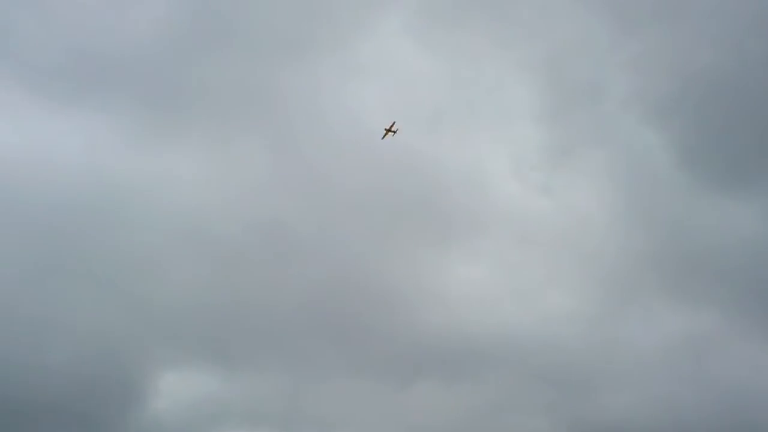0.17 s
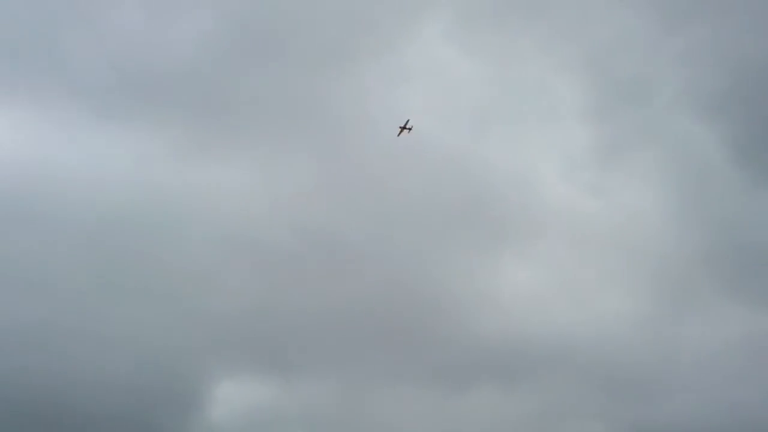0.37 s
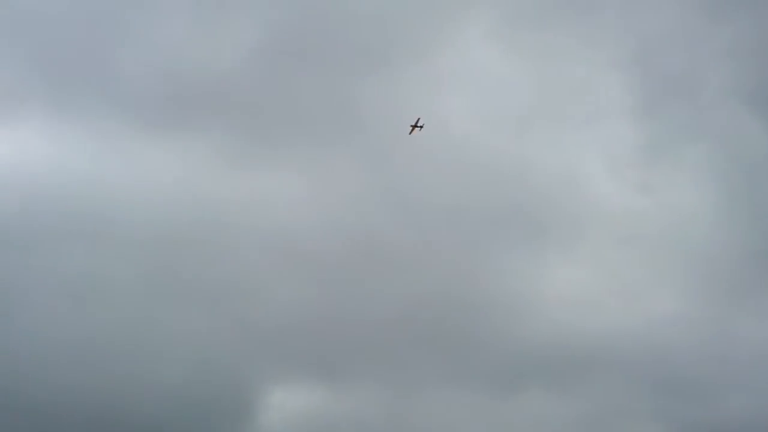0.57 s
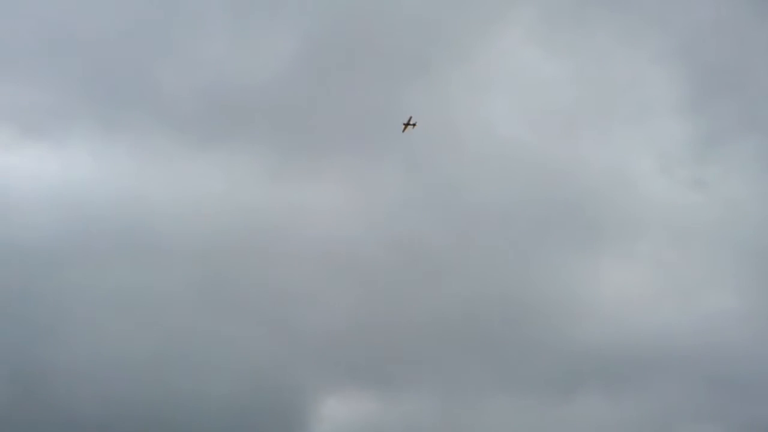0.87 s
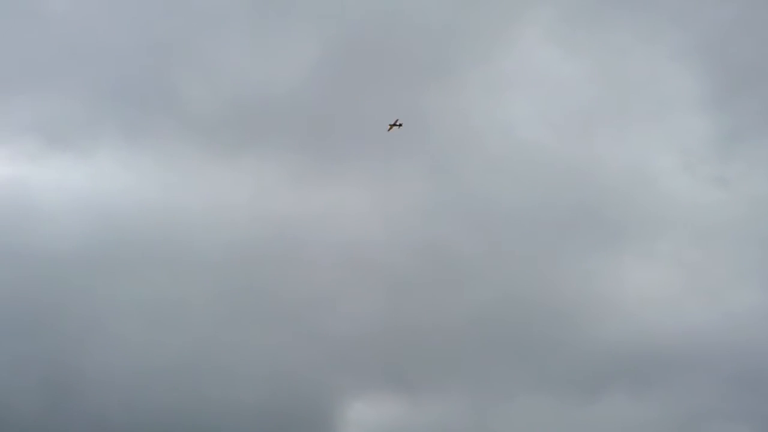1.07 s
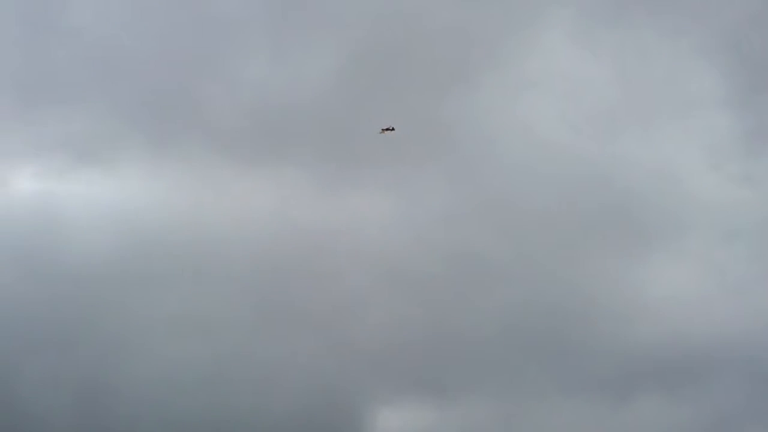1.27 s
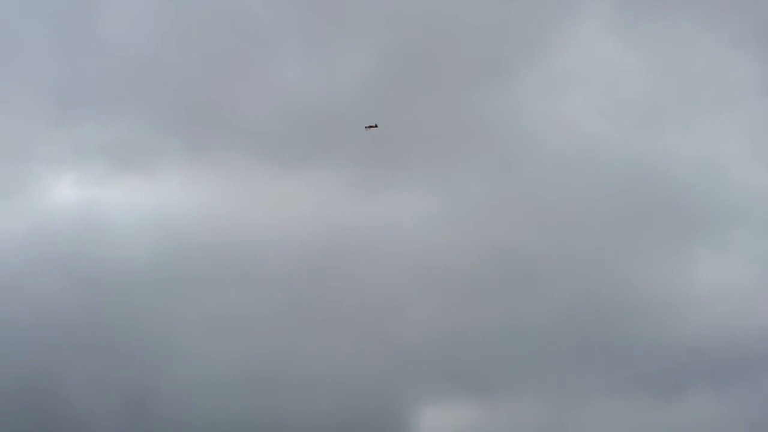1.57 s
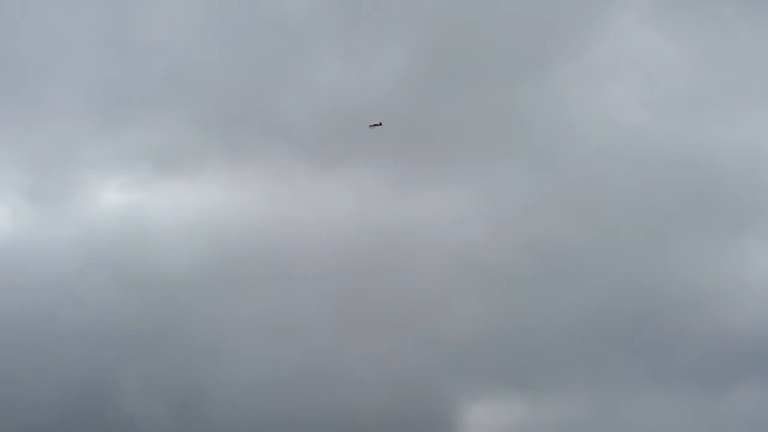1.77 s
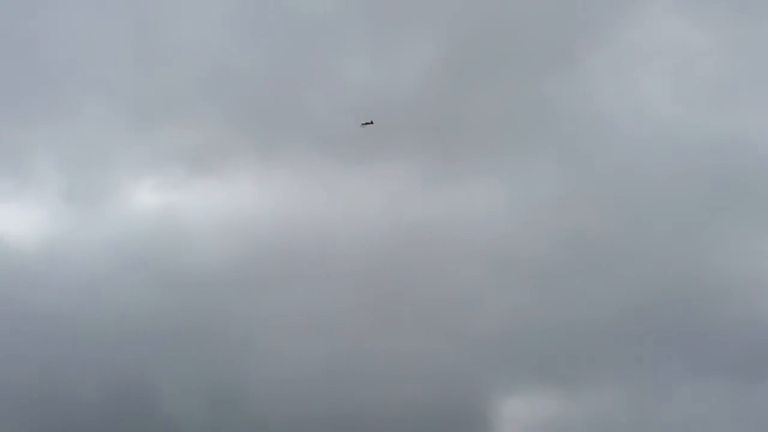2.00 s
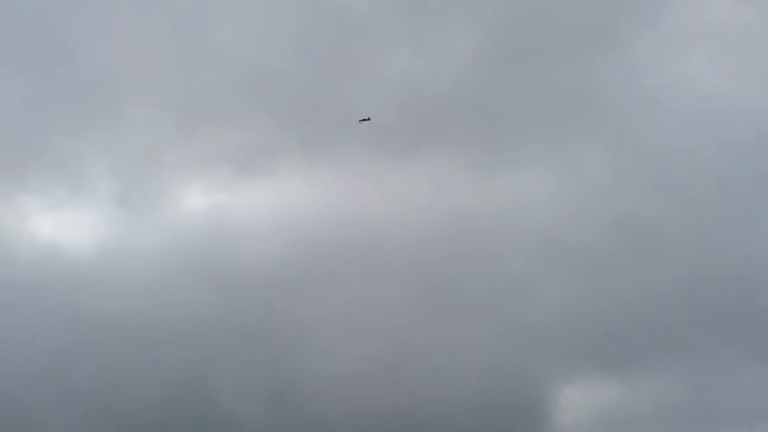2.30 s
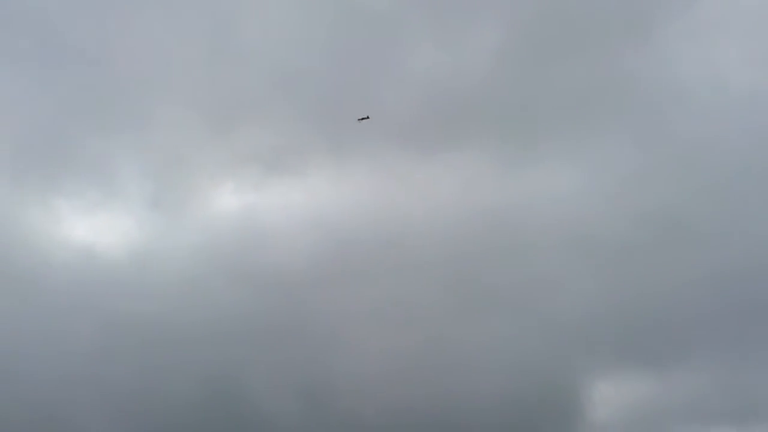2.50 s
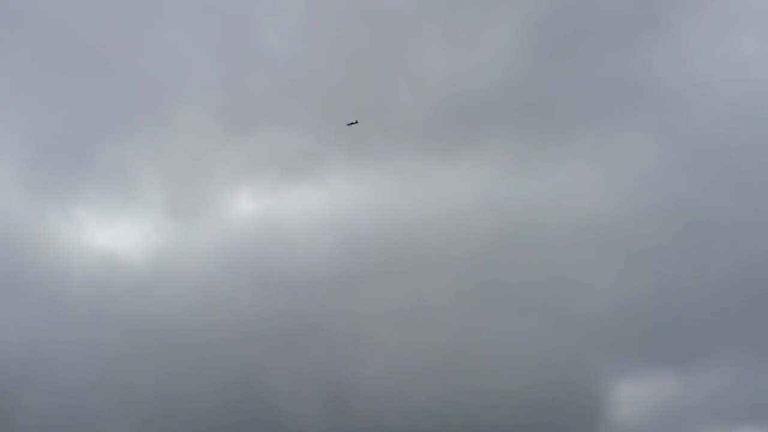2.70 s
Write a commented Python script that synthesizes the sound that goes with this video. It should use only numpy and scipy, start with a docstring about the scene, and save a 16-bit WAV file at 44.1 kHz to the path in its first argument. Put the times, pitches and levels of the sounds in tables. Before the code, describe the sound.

Loud, steady buzzing of a light propeller plane overhead, with gusts thumping the open-air microphone; after two seconds the throttle closes, the pitch slides down and the drone dies into quiet wind.

```python
"""Propeller aeroplane banking away, then throttling back

A small propeller aeroplane drones overhead at full power and banks away; then the throttle closes.
Additive synthesis of shaft harmonics carries the drone; a rasp of high harmonics and hiss pulses with the blades.
The slowing engine hums through a low resonance, by source and filter, with a short breathy whistle.
Filtered noise makes the gusts that buffet the microphone and the faint outdoor hush."""
import sys
import numpy as np
from scipy import signal
from scipy.fft import rfft, irfft, next_fast_len
from scipy.io import wavfile
from scipy.ndimage import uniform_filter1d, minimum_filter1d

SR = 44100
rng = np.random.default_rng(int(sys.argv[2]) if len(sys.argv) > 2 else 0)


def transcribe(signal):
    """Save signal, clipped to [-1, 1], as a 16-bit WAV file at the path in sys.argv[1]."""
    frames = np.atleast_2d(signal).T
    limited = np.clip(frames, -1, 1)
    pcm = np.round(limited * 32767).astype(np.int16)
    wavfile.write(sys.argv[1], SR, pcm)


N = 125685


def undb(db):
    """Decibel law: a level in dB becomes an amplitude ratio."""
    return 10 ** (np.asarray(db) / 20)


def seconds():
    """Uniform sampling: the time of each sample, in s."""
    return np.arange(N) / SR


def curve(rows):
    """Linear interpolation: straight lines in time through the rows."""
    times, values = np.array(rows).T
    return np.interp(seconds(), times, values)


def colour(hz, points):
    """Spectral envelope: gain at these frequencies, in dB straight over log frequency."""
    corner_hz, db = np.array(points).T
    return undb(np.interp(np.log(hz + 1e-9), np.log(corner_hz), db))


def noise(shape):
    """Spectral shaping: white noise with the gain shape(Hz) at each frequency, scaled to rms 1."""
    half = next_fast_len(N // 2 + 1)
    spectrum = rfft(rng.standard_normal(2 * half))
    hz = np.linspace(0, SR / 2, half + 1)
    shaped = irfft(spectrum * shape(hz))[:N]
    return shaped / shaped.std()


def bell(x, centre, width):
    """Gaussian window: 1 at the centre, with this standard deviation."""
    return np.exp(-.5 * ((x - centre) / width) ** 2)


def walk(rate_hz):
    """Slow random modulation: lines between random points at this rate, with a spread near 1."""
    points = rng.standard_normal(512)
    joined = np.interp(seconds() * rate_hz, np.arange(512), points)
    return joined * np.sqrt(3 / 2)  # restores the spread lost between points


def pulsing(turns, depth):
    """Amplitude modulation at the blade-passing rate, two swells a turn, rms 1."""
    gate = np.exp(depth * np.cos(2 * np.pi * 2 * turns))
    return gate / np.sqrt(np.mean(gate ** 2))


# outdoor hush: spectral envelope (frequency [Hz], gain [dB])
HUSH_COLOUR = [(100, 7.5), (500, -6), (900, 1), (1700, 3.5), (2300, -5.5), (3100, 2), (4200, -3.5),
               (5500, -1.5), (6800, -12.5), (10000, -21), (15000, -74)]
HUSH_DB = -40


def outdoor_hush():
    """Stationary broadband noise: a faint hush with a fixed spectral envelope."""
    return undb(HUSH_DB) * noise(lambda f: colour(f, HUSH_COLOUR))


HISS_S, HISS_RISE_S, HISS_DB = 2.22, 0.17, -57.5


def high_hiss():
    """Band-limited noise: a thin, high hiss fades in at 2.2 s."""
    rise = curve([(HISS_S, 0), (HISS_S + HISS_RISE_S, 1)])
    return undb(HISS_DB) * rise * noise(lambda f: bell(f, 12000, 3500))


# level of the wind rumble (time [s], level [dB])
GUST_LEVEL = [(0, -40), (.05, -33), (.08, -26), (.22, -14), (.42, -12.5), (.62, -13.5), (.69, -20),
              (.79, -22), (.87, -12.5), (1.05, -23.5), (1.3, -20), (1.65, -17.5), (2.0, -18.5), (2.24, -21),
              (2.34, -25), (2.39, -25), (2.58, -33), (2.7, -24), (2.8, -16.5), (2.85, -26.5)]
# spectral envelope of the wind rumble (frequency [Hz], gain [dB])
WIND_COLOUR = [(10, -15.5), (25, -4), (45, -2.5), (80, -0.5), (130, -8), (200, -13), (300, -24), (500, -30),
               (1000, -39), (3000, -150)]
# sharp buffets (time [s], length [s], level relative to BUFFET_DB [dB])
BUFFETS = [(0.409, 0.012, 10.5), (0.646, 0.0068, 13), (0.88, 0.04, -13.5), (2.783, 0.01, -10)]
# dull thumps of wind on the microphone (time [s], length [s], level [dB])
THUMPS = [(2.23, 0.038, -16), (2.335, 0.0113, -11.5)]
BUFFET_DB, BUFFET_HZ, BUFFET_WIDTH_HZ = -24, 147, 125
THUMP_HZ = 70.3


def wind():
    """Turbulent pressure on a microphone: low rumble that follows the gusts, brighter buffets and dull thumps."""
    t = seconds()
    rumble = noise(lambda f: colour(f, WIND_COLOUR))
    # even out the noise so that the gusts alone set its level
    rumble = rumble / np.sqrt(uniform_filter1d(rumble ** 2, size=4000))
    knocks = sum(undb(db) * bell(t, at, length) for at, length, db in BUFFETS)
    buffets = undb(BUFFET_DB) * knocks * noise(lambda f: bell(f, BUFFET_HZ, BUFFET_WIDTH_HZ))
    thumps = 0
    for at, length, db in THUMPS:
        tone = np.cos(2 * np.pi * (THUMP_HZ * t + rng.random()))
        thumps = thumps + undb(db) * bell(t, at, length) * tone
    return rumble * undb(curve(GUST_LEVEL)) + thumps + buffets


# shaft speed before its slight wobble (time [s], speed [turns per second])
SHAFT_SPEED = [(0, 99.45), (.3, 99.45), (.7, 99.7), (1, 100), (1.5, 100.5), (2.03, 101), (2.1, 99.5),
               (2.15, 95.8), (2.25, 83), (2.35, 71), (2.45, 64), (2.6, 56.5), (2.7, 52), (2.85, 49)]
SPEED_WOBBLE = .0007  # spread, as a fraction of the speed


def shaft_speed():
    """Frequency modulation: the shaft speed with a slight random wobble, in turns per second."""
    return curve(SHAFT_SPEED) * (1 + SPEED_WOBBLE * walk(15))


# spectral envelope of the unloaded engine's hum (frequency [Hz], gain [dB])
IDLE_COLOUR = [(100, -24), (170, 2.5), (215, -0.5), (265, -34), (335, 8.5), (400, -6.5), (480, -5.5),
               (580, -18)]
# level of the hum (time [s], level [dB])
IDLE_LEVEL = [(2.0, -49), (2.12, -23), (2.22, -37), (2.35, -43.5), (2.6, -47.5), (2.85, -72)]
IDLE_TOP_HZ = 560
WHISTLE_S, WHISTLE_LENGTH_S, WHISTLE_HZ, WHISTLE_WIDTH_HZ, WHISTLE_DB = 2.163, 0.052, 4670, 250, -31


def wind_down(turns, speed):
    """Source and filter: falling harmonics light up a low resonance; a whistle marks the closing throttle."""
    hum = 0
    for k in range(2, 11):
        hz = k * speed
        gain = colour(hz, IDLE_COLOUR) / (1 + (hz / IDLE_TOP_HZ) ** 8)
        hum = hum + gain * np.cos(2 * np.pi * (k * turns + rng.random()))
    breath = noise(lambda f: bell(f, WHISTLE_HZ, WHISTLE_WIDTH_HZ))
    whistle = breath * bell(seconds(), WHISTLE_S, WHISTLE_LENGTH_S)
    return hum * undb(curve(IDLE_LEVEL)) + undb(WHISTLE_DB) * whistle


# narrow bands of harmonics that swell or fade for a moment
# (time [s], length [s], centre [Hz], width [Hz], change [dB])
SWELLS = [(0.373, 0.08, 4875, 50, 7.5), (0.265, 0.09, 5750, 172, 16), (.52, 0.1, 964, 40, -13),
          (0.744, 0.17, 1215, 40, -35), (.76, 0.061, 2064, 60, 8.5), (.8, 0.03, 3800, 50, 8),
          (1.035, 0.12, 2950, 40, 12), (1.028, .14, 2390, 35, 10), (1.27, 0.068, 500, 40, 4.5),
          (1.36, 0.08, 4000, 250, 10.5), (1.65, 0.14, 700, 40, 5), (1.682, 0.086, 570, 40.6, -17),
          (1.952, 0.36, 2930, 200, 11), (1.88, 0.12, 4910, 130, 5.5), (1.942, 0.12, 8270, 600, 11),
          (2.03, 0.094, 700, 40, 0)]


def swell_db(order):
    """Local spectral modulation: passing swells and fades of one shaft harmonic, in dB."""
    t = seconds()
    hz = order * SHAFT_SPEED[2][1]  # nominal pitch in flight
    change = 0
    for at, length, centre, width, db in SWELLS:
        nearness = bell(hz, centre, width)
        if nearness > .01:
            change = change + db * nearness * bell(t, at, length)
    return change


# how far the aeroplane has banked (time [s], bank [0 level to 1 on its side])
BANK = [(0, 0.37), (.15, 0.43), (.38, 0.7), (.55, 0.8), (.8, 0.96), (1.1, 1), (1.4, 0.98), (1.7, 1),
        (2.05, 1)]


def banking():
    """Source orientation: the bank that steers the balance of the harmonics."""
    return curve(BANK)


# level of the treble (time [s], level [dB])
TREBLE_LEVEL = [(0, -23), (.26, -26), (.29, -21), (.38, -24), (.405, -35), (.48, -27), (.53, -31),
                (.82, -28), (.87, -33.5), (.95, -31), (1.34, -29.5), (1.45, -31), (2.0, -29.5),
                (2.1, -30.5), (2.16, -28), (2.21, -34.5), (2.3, -39.5), (2.42, -56), (2.85, -60)]
# spectral envelope of the rasp's hiss (frequency [Hz], gain [dB])
RASP_COLOUR = [(1900, 4.5), (2400, 0), (3050, -3), (3700, 0), (4400, 1), (4900, 1), (5250, 2.5),
               (5700, 1.5), (6500, -9.5), (8500, -13.5), (9400, -37), (11000, -131)]
# spectral envelope of the rasp's harmonics (frequency [Hz], gain flying level [dB], gain banked [dB])
RASP_LINES = [(1500, -10.5, -5), (2110, -17, -6.5), (2560, -10.5, 1), (2910, 0, -7.5), (3083, 18, -1),
              (3450, -9, -3.5), (4100, -11, -4), (4820, -2.5, -5.5), (4870, 7.5, 4.5), (4970, -12, -5.5),
              (5420, -13.5, -4.5), (6670, -3, -9), (8070, -25.5, -17.5), (9400, -25, -23)]
RASP_LINES_DB, RASP_NOISE_DB = -17.3, -4  # relative to the treble level
RASP_FADE_DB, RASP_FLICKER_DB, RASP_PULSE = 4, 1.4, 0.45
RASP_JITTER_TURNS, RASP_SCATTER_RAD = 0.00055, 1.1
THROTTLE_S, THROTTLE_LAG_S = 2.16, 0.02


def rasp(turns):
    """Scattering by turbulence: high harmonics fade in and out, with hiss that pulses in step with the blades."""
    bank = banking()
    grid_hz, level_db, banked_db = np.array(RASP_LINES).T
    shaky = turns + RASP_JITTER_TURNS * walk(60)
    lines = 0
    for k in range(15, 92):
        hz = k * SHAFT_SPEED[0][1]
        fade_db = RASP_FADE_DB * np.clip(walk(4.28), -2, 1) + swell_db(k)
        level_part = (1 - bank) * np.interp(hz, grid_hz, level_db)
        banked_part = bank * np.interp(hz, grid_hz, banked_db)
        lag = k % 2 * np.pi / 2 + RASP_SCATTER_RAD * rng.standard_normal()
        lines = lines + undb(fade_db + level_part + banked_part) * np.cos(2 * np.pi * k * shaky + lag)
    # the harmonics die as the throttle closes
    throttle = .5 - .5 * np.tanh((seconds() - THROTTLE_S) / THROTTLE_LAG_S / 2)
    tones = undb(RASP_LINES_DB) * throttle * np.sqrt(2) * lines
    # the fraction is a high-pass at 1500 Hz
    hiss = noise(lambda f: colour(f, RASP_COLOUR) * f ** 4 / (f ** 4 + 1500 ** 4))
    hiss = undb(RASP_NOISE_DB) * hiss * pulsing(turns, RASP_PULSE)
    return undb(curve(TREBLE_LEVEL) + RASP_FLICKER_DB * walk(51.3)) * (tones + hiss)


CUT_S, CUT_DB_PER_S = 2.075, 260  # the throttle closes; fall of the drone's harmonics


def since_cut():
    """Onset of decay: time since the throttle closed, in s."""
    return np.maximum(seconds() - CUT_S, 0)


# level of the drone and its wash before the throttle's further fade (time [s], level [dB])
POWER_LEVEL = [(0, -10.5), (.3, -7.5), (.38, -1.5), (.41, -10), (.47, -2.5), (.55, -5), (.8, 0.5),
               (.87, -3), (.92, 1), (1.25, 0), (1.5, 0), (2.04, -1.5), (2.1, -3.5)]
# spectral envelope of the air churned by the blades (frequency [Hz], gain [dB])
WASH_COLOUR = [(250, -2.5), (500, 3), (750, 0.5), (1100, 6), (1500, 7.5), (1900, -5), (2500, -9),
               (4000, -50)]
WASH_DB, WASH_PULSE = -33.5, .85
WASH_FADE_DB_PER_S = 51  # the churned air dies away more slowly than the tones


def blade_wash(turns):
    """Modulated turbulence noise: the air churned by the blades swells at each passage."""
    wash = noise(lambda f: colour(f, WASH_COLOUR)) * pulsing(turns, WASH_PULSE)
    return undb(WASH_DB + curve(POWER_LEVEL) - WASH_FADE_DB_PER_S * since_cut()) * wash


# the drone's harmonics (shaft order [cycles per turn], level flying level [dB], level banked [dB])
DRONE = [(3, -46, -36), (4, -20.5, -34.5), (5, -46.5, -33), (6, -22.5, -39.5), (7, -19, -32),
         (8, -21, -64.5), (9, -22, -47), (10, -6.5, -28.5), (11, -19, -34), (12, -5.5, -34), (13, -50, -49),
         (14, -54, -26), (15, -39, -36), (16, -41.5, -35), (17, -60, -44.5), (18, -61.5, -39.5),
         (19, -37.5, -48), (20, -59, -37.5)]
# harmonics that change as the aeroplane turns its tail to the listener
# (shaft order [cycles per turn], change [dB])
TAIL_ON = [(5, -3), (6, 3), (7, -7), (9, -3), (10, 2.5), (11, -4), (12, 4), (14, -6.5), (15, -3), (16, -8),
           (18, -6), (20, -13)]
TAIL_ON_S, TAIL_TURN_S = 1.19, 0.15
BLADE_DB, BLADE_BANK_DB, BLADE_TAIL_DB = -27.5, 6, 0.5  # two blades: the second shaft order
BLADE_FADE_S, BLADE_FADE_DB_PER_S = 2.12, 52
FLUTTER_DB, SMEAR_RAD = 2.28, 0.057


def drone(turns):
    """Additive synthesis with directivity: blade tone and shaft harmonics, balanced by the aeroplane's turn."""
    t, bank, power, closed = seconds(), banking(), curve(POWER_LEVEL), since_cut()
    tail_on = .5 + .5 * np.tanh((t - TAIL_ON_S) / TAIL_TURN_S)
    tail_db = {round(order): db for order, db in TAIL_ON}
    # the blade tone keeps the gain of the furthest bank reached
    blade_db = BLADE_DB + BLADE_BANK_DB * np.maximum.accumulate(bank) + BLADE_TAIL_DB * tail_on
    blade_db = blade_db - BLADE_FADE_DB_PER_S * np.maximum(t - BLADE_FADE_S, 0) + .5 * walk(5.2)
    tones = undb(blade_db) * np.cos(2 * np.pi * 2 * turns)
    for k, (_, level_db, banked_db) in enumerate(DRONE, 3):
        size = undb(level_db) + np.clip(bank, 0, 1) * (undb(banked_db) - undb(level_db))
        db = tail_on * tail_db.get(k, 0) + power - CUT_DB_PER_S * closed
        db = db + swell_db(k) + FLUTTER_DB * walk(8.04)
        # odd orders are shifted a quarter cycle so the two pulses of a turn come out equally strong
        lag = SMEAR_RAD * (k - 10) ** 2 + k % 2 * np.pi / 2
        tones = tones + size * undb(db) * np.cos(2 * np.pi * k * turns + lag)
    return np.sqrt(2) * tones


OVERLOAD = .5  # amplitude at which the wind saturates


def scene():
    """Superposition and saturation: all sources meet in a microphone that the gusts push towards overload."""
    speed = shaft_speed()
    turns = np.cumsum(speed) / SR
    background = outdoor_hush() + high_hiss()
    push = np.tanh(wind() / OVERLOAD)
    plane = wind_down(turns, speed) + rasp(turns) + blade_wash(turns) + drone(turns)
    # each swing of a strong gust chokes the aeroplane's sound, so that it flutters
    choked = (1 - push ** 2) * plane
    return (OVERLOAD * push + choked + background)[None]


LIMIT, LIMIT_HOLD_S, TOP_HZ = .48, .008, 15700


def record(dry):
    """Peak limiting and low-pass filtering: the gain ducks around the peaks, then the top is cut."""
    size = int(LIMIT_HOLD_S * SR)
    gain = np.minimum(1, LIMIT / (np.abs(dry) + 1e-9))
    gain = minimum_filter1d(gain, size=size)
    for _ in range(2):
        gain = uniform_filter1d(gain, size=size // 2)
    low_pass = signal.ellip(8, .2, 70, TOP_HZ, fs=SR, output="sos")
    return signal.sosfilt(low_pass, dry * gain)


dry = scene()
out = record(dry)
transcribe(out)
```